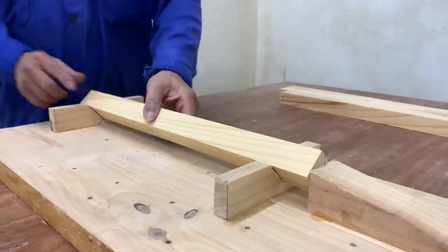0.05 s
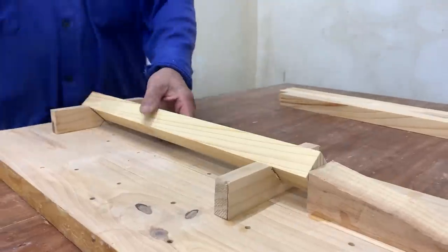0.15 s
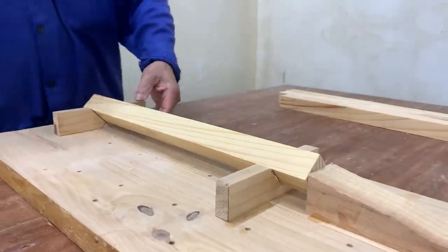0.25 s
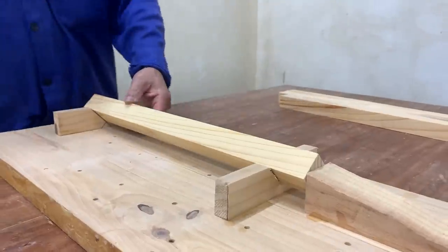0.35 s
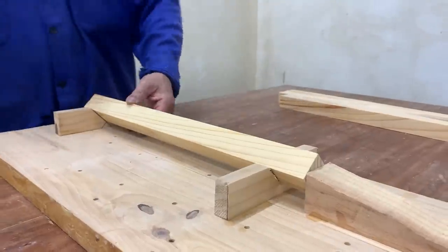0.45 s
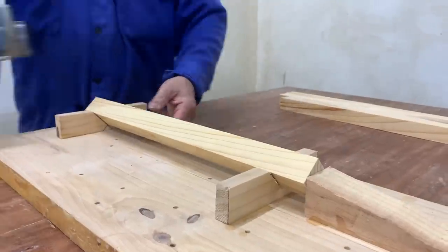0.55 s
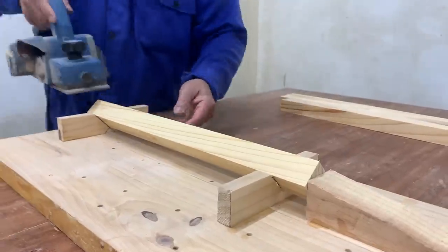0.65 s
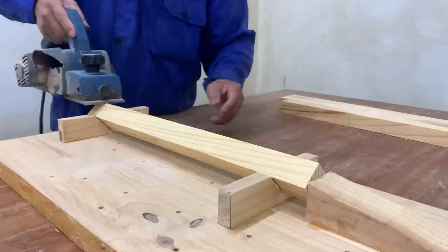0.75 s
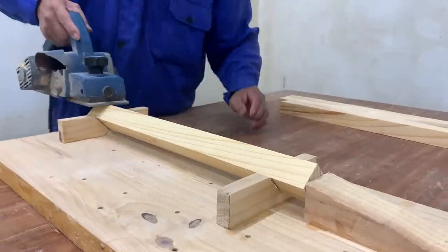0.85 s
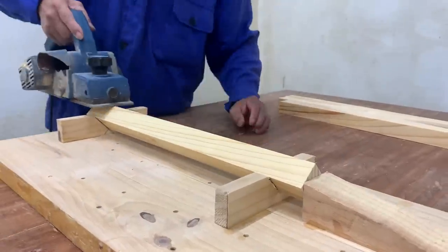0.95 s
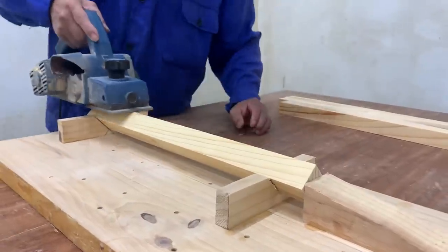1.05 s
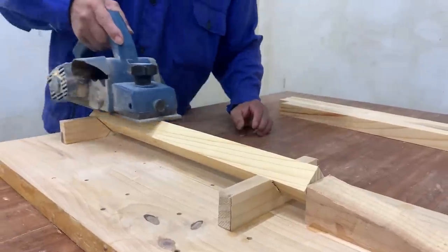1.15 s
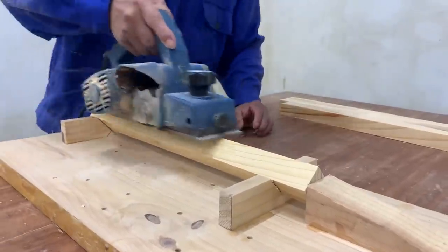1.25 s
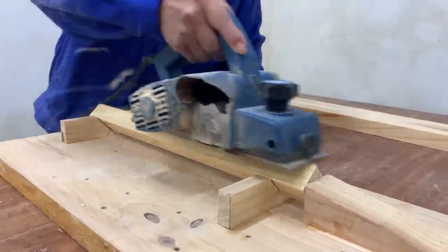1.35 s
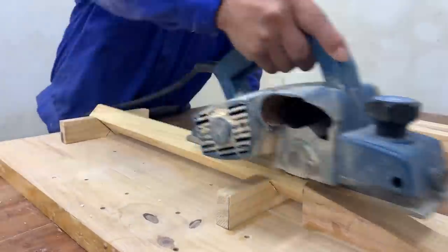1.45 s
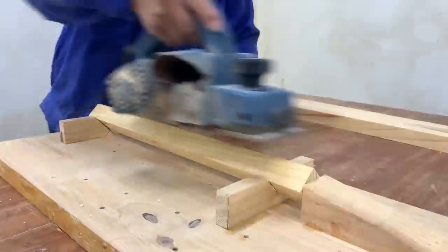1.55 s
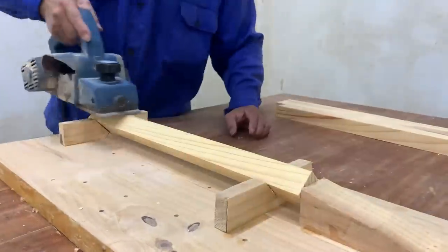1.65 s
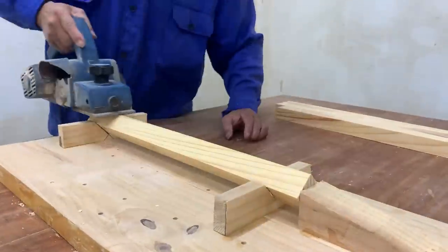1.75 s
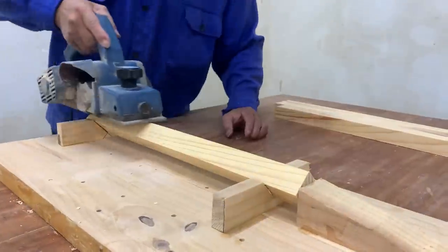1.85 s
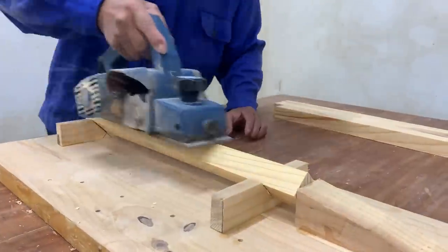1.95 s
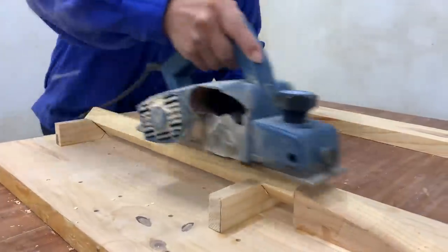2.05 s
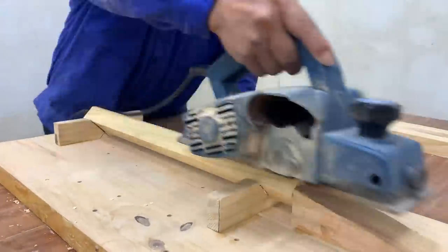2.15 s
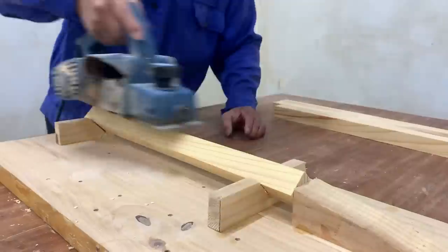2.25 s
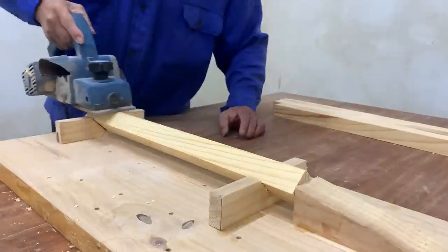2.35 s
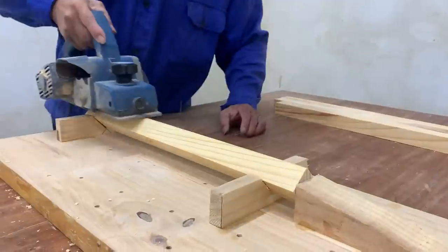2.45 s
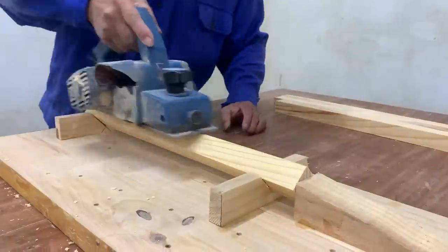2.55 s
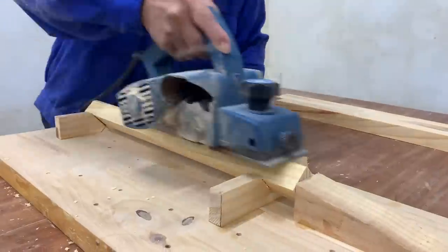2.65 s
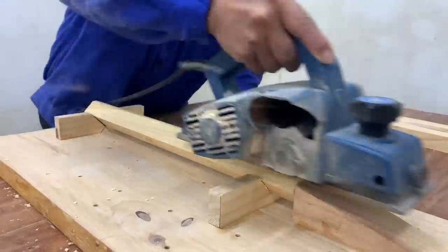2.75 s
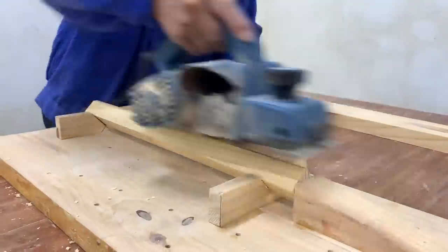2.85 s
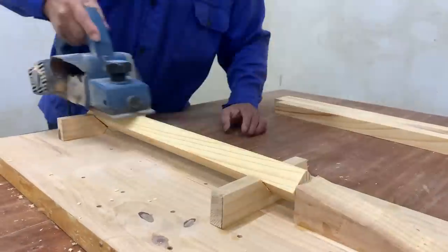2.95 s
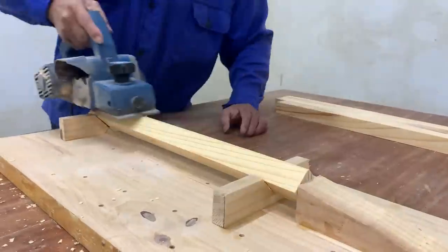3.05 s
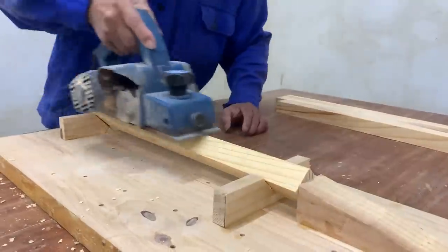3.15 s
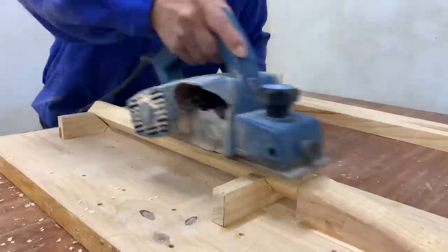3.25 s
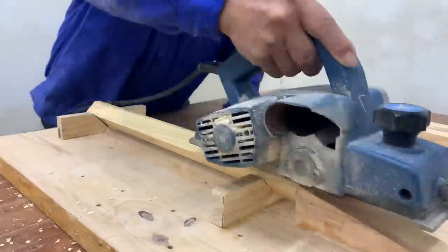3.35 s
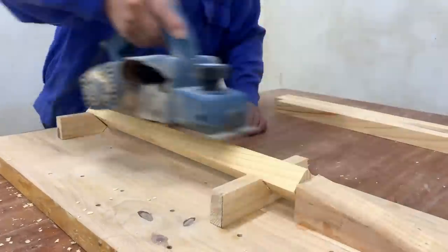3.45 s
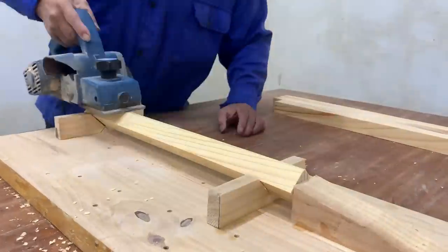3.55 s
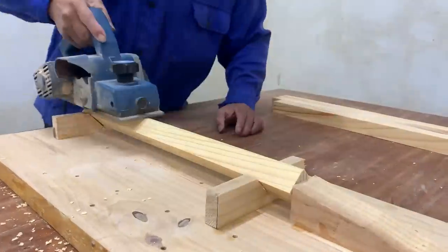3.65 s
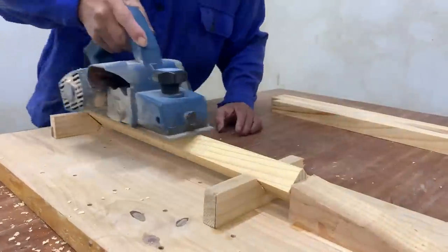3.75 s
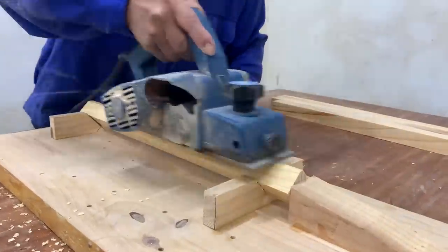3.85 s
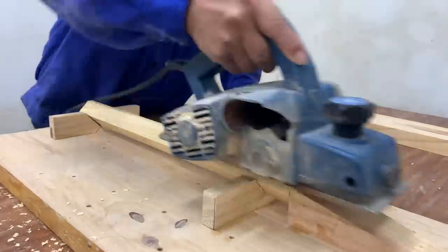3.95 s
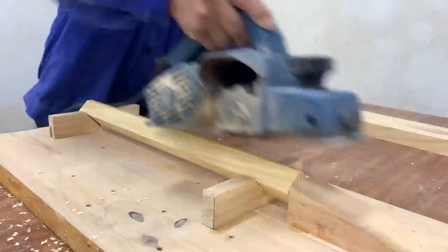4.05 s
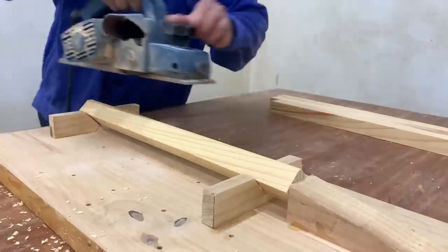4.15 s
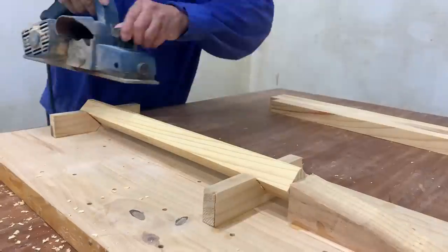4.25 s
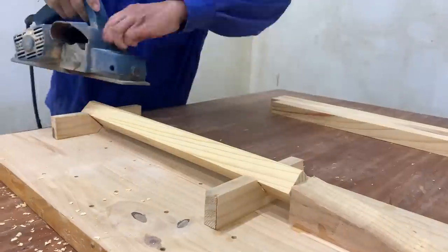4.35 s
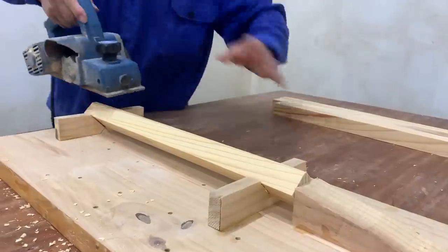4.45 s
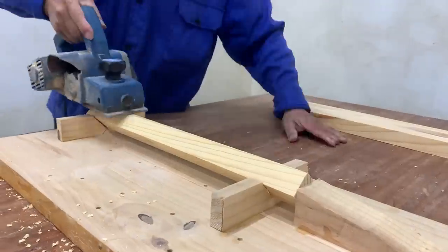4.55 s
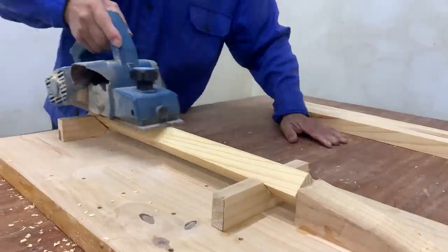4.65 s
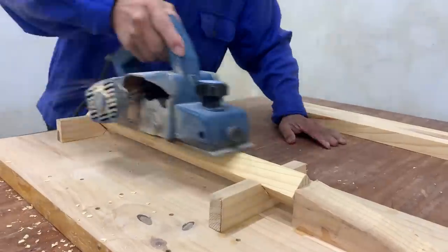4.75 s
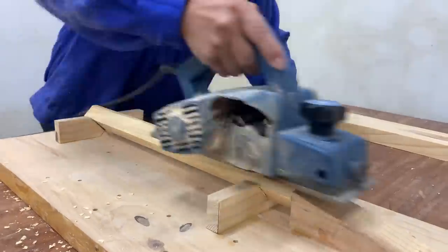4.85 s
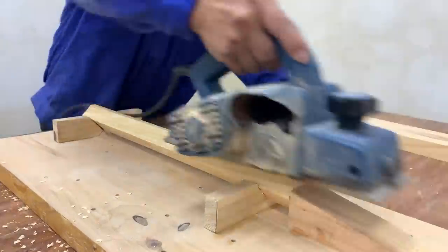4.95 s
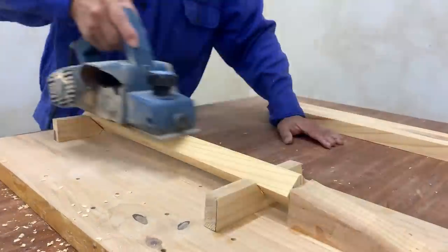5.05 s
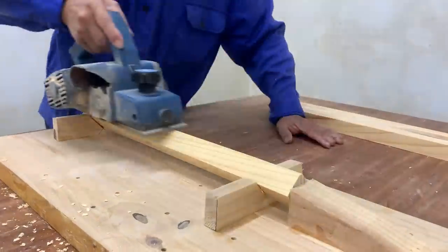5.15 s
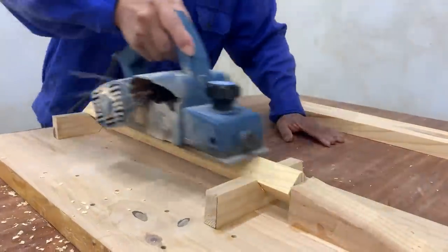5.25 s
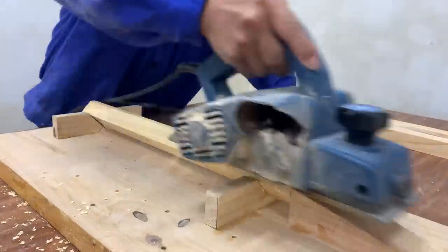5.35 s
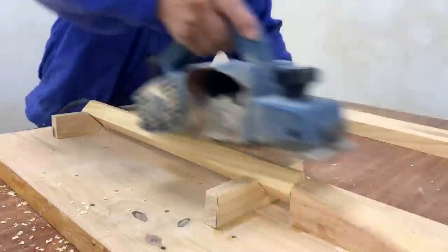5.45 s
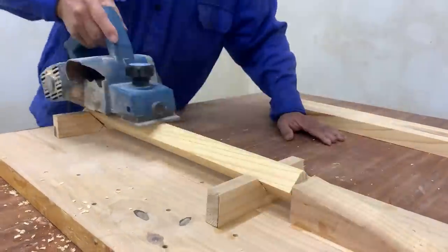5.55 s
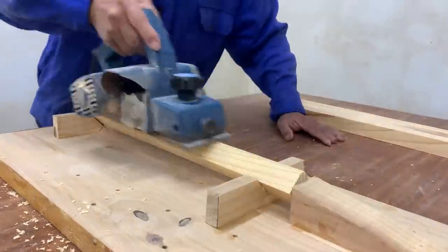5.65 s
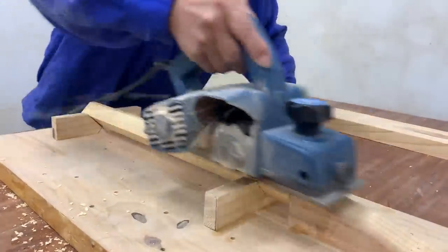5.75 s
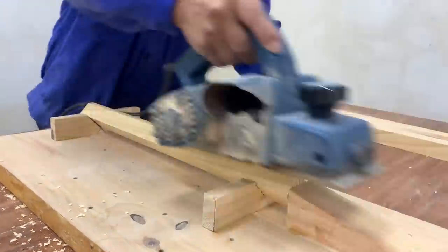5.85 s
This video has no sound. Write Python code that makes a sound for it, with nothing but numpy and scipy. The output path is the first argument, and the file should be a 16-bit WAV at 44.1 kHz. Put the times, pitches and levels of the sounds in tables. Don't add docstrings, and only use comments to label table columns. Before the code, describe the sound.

A dry, bare workshop is heard through close stereo microphones with little deep bass. From 0 to 0.4 s a wooden batten softly touches, chatters and cracks hard against its jig, the sharpest knock near 0.25 s; faint taps follow around 0.75-0.85 s. Beneath, a planer quietly coasts down with a thin high squeal. Near 0.97 s the motor kicks in with a short low buzz and slipping chirps, racing quickly up to a piercing, many-layered electric whine with rushing, hissy air. The tool swells closer and drops slightly in pitch on passes near 1.5, 2.3, 2.9, 3.4 and 4.1 s. Pitch and level sag briefly at 1.6-1.77 s, then more deeply during a long coast from 4.13 to 4.57 s. The whine climbs again, with further passes near 5.0, 5.5 and 5.9 s. Faint low bumps mark the sole meeting wood; it ends still running.

```python
import sys
import numpy as np
from scipy import signal
from scipy.io import wavfile
from scipy.ndimage import uniform_filter1d, minimum_filter1d

SR = 44100
rng = np.random.default_rng(int(sys.argv[2]) if len(sys.argv) > 2 else 0)


def persist_wave(psi):
    counts = np.round(np.clip(psi, -1, 1) * 32767).astype(np.int16)
    wavfile.write(sys.argv[1], SR, np.atleast_2d(counts).T)


def boost(x):
    u = np.asarray(x, float) / 20
    return 10 ** u


N = 259749

START_S = 0.972
TOP_HZ, PULL_HZ_PER_S, PULL_LAW, DRAG_HZ_PER_S, GRIP_S = 1773, 5300.0, 1.36, 1312.0, 0.03
COAST_HZ, COAST_PER_S, COAST_DB_PER_S = 780.0, 0.47, -17.5
SAG_HZ = 31.19
SURGE_S, LULL_S, LULL_DB = 0.18, 0.081, -4.5
# off t/s, on again t/s
RELEASES = [
    (1.595, 1.767),
    (4.134, 4.569),
]
# nearest t/s, reach/1, approach/s, retreat/s
STROKES = [
    (1.518, 1.27, 0.28, 0.14),
    (2.263, 1.006, 0.19, 0.083),
    (2.88, 0.9, 0.22, 0.093),
    (3.44, 0.92, 0.17, 0.097),
    (4.131, 0.81, 0.212, 0.19),
    (5.028, 0.999, 0.144, 0.11),
    (5.501, 1.02, 0.1, 0.084),
    (5.931, 0.96, 0.11, 0.095),
]

ORDERS = (12, 24, 36, 60, 6, 11, 22, 28.4)
# far level/dB, rise/dB per reach, rise/dB per octave of speed, surge/dB, coasting level/dB
VOICES = [
    (-31.5, 5, 27, -6, -42.5),
    (-28.5, 5.3, 25.5, 26.5, -42),
    (-36.5, 10.5, 25.5, 28.5, -45.5),
    (-47.5, 8, 21.6, 16, -66),
    (-46.5, 6, 18, 38, -39.5),
    (-37.5, 6, 30, 16, -58),
    (-35, 5.5, 11, 11, -57),
    (-41, 11.5, 9, 1, -48),
]
# shaft order/1, level/dB over the top air
SLOT_ORDERS = [(18, -11), (30, -2), (42, -5), (48, -1.5), (54, -7.5), (66, -7.5), (72, -4.5), (78, -16.5),
               (84, -9.5), (90, -24), (96, -5), (108, -9)]
# shaft order/1, level/dB over blades x2
FAN_ORDERS = [(33, -10), (44, -37), (55, -17.5), (67, -26.5), (99, -25)]
# shaft order/1, level/dB over the teeth
BELT_ORDERS = [(34.4, -16.5), (39.4, -11), (45.4, -30), (50.4, -17), (56.8, -17), (61.4, -12.5),
               (67.8, -40.5)]
UPPER_SURGE_DB, UPPER_LULL_DB = -4.5, -0.5
HOUSING_HZ, HOUSING_WIDTH, HOUSING_DB = 3320, 0.074, 4.5
# t/s, shaft order/1, level/dB, half width/s
GLINTS = [(1.29, 12.0, 12, 0.18), (1.3, 24.0, -17, 0.015), (1.45, 24.0, -9.5, 0.04),
          (1.46, 28.4, -13.5, 0.048), (1.61, 36.0, 4, 0.025), (1.69, 12.0, 8, 0.052),
          (1.712, 28.4, 10.4, 0.025), (1.941, 24.0, 5.5, 0.031), (2.13, 24.0, -17, 0.023),
          (2.49, 28.4, -5, 0.23), (2.578, 60.0, 16.5, 0.035), (3.11, 28.4, -17, 0.035),
          (3.19, 60.0, 16, 0.029), (3.27, 24.0, -12.3, 0.03), (3.31, 22.0, -10, 0.09),
          (3.38, 12.0, -3.5, 0.044), (3.83, 24.0, -18, 0.033), (4.03, 28.4, 6.5, 0.16),
          (4.11, 24.0, 2, 0.16), (4.24, 12.0, 6.5, 0.058), (4.39, 28.4, 6.5, 0.035), (5.43, 28.4, 7, 0.25),
          (5.47, 24.0, 2.5, 0.11), (5.69, 24.0, -14, 0.018),
          (1.1, 36.0, 6.5, 0.083), (1.35, 36.0, -6, 0.08), (1.38, 28.4, 6.5, 0.095), (1.9, 6.0, 8, 0.069),
         (1.95, 12.0, 4.5, 0.11), (2.37, 11.0, 12, 0.022), (2.46, 36.0, -16, 0.026), (2.52, 22.0, 4, 0.082),
         (2.59, 24.0, 5.5, 0.023), (2.72, 24.0, -10.0, 0.032), (3.22, 36.0, -7, 0.063),
         (3.56, 36.0, -2, 0.024), (4.0, 36.0, -11, 0.029), (4.008, 60.0, 11.5, 0.014),
         (4.569, 36.0, 14, 0.068), (5.34, 11.0, 7.5, 0.13), (5.69, 22.0, -3, 0.13), (5.82, 36.0, -3, 0.021),
         (5.83, 60.0, 12, 0.019), (5.88, 24.0, 1.5, 0.051)]
# t/s, shaft order/1, level/dB, half width/s
SWEEPS = [
    (1.035, 36, 4, 0.023),
    (1.067, 24, 8, 0.02),
    (1.03, 28.4, 6, 0.016),
    (0.97, 6, -4, .04),
    (4.44, 6, -8, 0.091),
    (4.17, 24, -4.5, 0.058),
    (4.37, 28.4, 2.5, 0.028),
    (4.55, 24, 6, 0.055),
    (4.66, 28.4, 9, 0.028),
    (4.3, 12, 2, 0.1),
]

# far level/dB, rise/dB per reach, rise/dB per octave, surge/dB
RUSH = (-38, 4, 7, 25)
LOW = (-14, 0.4, 3, -1)
TOP = (-7, 5, -2.5, 0.5)
LOW_LULL_DB, TOP_LULL_DB = -2, 0.5
SHOP_DB, SHOP_DB_PER_S, SHOP_TOP_DB, ECHO_DB, ECHO_DB_PER_S = -37, -12, -15, -13.5, -130
# f/Hz, level/dB per Hz
AIR_COLOUR = [(180, -37.5), (300, -22), (800, -20.5), (1290, -14.5), (1760, -9), (2330, -12), (3240, -10),
              (5700, -15), (8000, -16), (10400, -23), (12000, -18.5), (13600, -16.5), (14800, -14.5),
              (15600, -27)]
# f/Hz, level/dB per Hz
SHOP_COLOUR = [(40, -60), (110, -15), (240, -18), (330, -9), (500, -12), (850, -3), (1250, -8),
               (1650, -16.5), (2900, -9), (5000, -14.5), (6500, -21.5), (10000, -28), (15500, -35.5)]
# t/s, level/dB, dying/dB per s
BUMPS = [(.85, -51, -150), (.97, -48, -150), (1.17, -50.5, -140), (1.28, -56, -300), (1.758, -51.5, -300),
         (1.91, -58, -180), (2.18, -54, -280), (2.39, -54, -125), (2.78, -54.5, -400), (2.91, -58, -300),
         (3., -57, -300), (3.07, -49.5, -370), (3.34, -59, -370), (3.6, -53.5, -310), (3.71, -51, -135),
         (4.67, -57, -200), (4.74, -54, -85), (5.16, -49, -340), (5.26, -52, -150), (5.56, -53, -260),
         (5.66, -48, -170)]
BUMP_RISE_DB_PER_S = 308

# f/Hz, correlation/1
SAME = [(60, 0.17), (180, 0.72), (550, 0.6), (1650, 1), (4970, -0.51), (15000, -1.7)]
# f/Hz, left minus right level/dB
LEAN = [(60, -5), (180, -1), (550, -0.5), (1650, -4.5), (4970, 0.5), (15000, -2)]
# f/Hz, left lead/rad
LEAD = [(0, -0.5), (2930, 0.5), (7410, 2), (8010, -1.5), (9820, -1.4), (14300, -2), (16600, -2.5)]

# t/s, length/s, from f/Hz, to f/Hz, level/dB
SQUEAKS = [
    (.0, .55, 12620, 12560, -58),
    (.48, .04, 12550, 12550, -59),
    (.978, .028, 11650, 11700, -38),
    (1.025, .045, 10700, 11900, -32),
    (.982, .016, 2300, 2350, -30),
]
# t/s, level/dB, rattle length/s, first crack over the rattle/dB, swell/dB per s
KNOCKS = [
    (0.072, -28, 0.033, -5, -100.0),
    (0.141, -22, 0.033, 9, 120.0),
    (0.239, -19, 0.043, 23, -22),
    (.293, -33.5, 0.048, 8, -30.0),
    (0.746, -43, 0.018, -1, -54),
    (0.821, -54, 0.059, 6, -50.0),
    (0.85, -46, 0.022, -8, -46),
]
# f/Hz, width/Hz, level/dB
BATTEN = [(300, 26, -14.5), (463, 40, -2), (590, 44, -9), (716, 28, -7.5), (842, 19, -2.5), (901, 22, 0),
          (1190, 78, -4.5), (1380, 100, -5.5), (1830, 200, -5), (2210, 140, -4), (2790, 160, -6.5),
          (3460, 320, -7.5)]

HUM_START_DB, HUM_HOLD_S, HUM_DB_PER_S = -29, 0.048, -190
HUM_DB, HUM_NEAR_DB, HUM_OFF_DB = -56, -9.5, -16


def evened(x):
    return x / np.sqrt(np.mean(x ** 2) + 1e-20)


def read(points, hz):
    f, value = np.transpose(points)
    return np.interp(np.log(hz + 1), np.log(f + 1), value)


def wander(per_s, count, t):
    knots = evened(uniform_filter1d(rng.standard_normal((count, 2400)), 4, axis=1))
    return np.array([np.interp(t * per_s * 4, np.arange(2400), k) for k in knots])


def bell(x):
    return np.exp(-0.5 * x ** 2)


def resonate(x, hz, width_hz):
    turn = np.exp(2j * np.pi * np.cumsum(hz * np.ones(len(x))) / SR)
    r = np.exp(-np.pi * width_hz / SR)
    return 2 * (turn * signal.lfilter([1 - r], [1, -r], x / turn)).real


def add(mix, s, sound):
    part = mix[round(s * SR):][:len(sound)]
    part += sound[:len(part)]


def controls(t):
    step = 64 / SR
    s = np.arange(START_S, N / SR + 0.1, step)
    off = sum(np.clip((s - a) / step, 0, 1) - np.clip((s - b) / step, 0, 1) for a, b in RELEASES)
    current = (1 - off) * np.minimum((s - START_S) / GRIP_S, 1)
    hz = [COAST_HZ * np.exp(-COAST_PER_S * START_S)]
    for on in current[1:]:
        pull = PULL_HZ_PER_S * ((hz[-1] / TOP_HZ) ** -PULL_LAW - 1) + DRAG_HZ_PER_S
        hz.append(hz[-1] + step * (on * pull - DRAG_HZ_PER_S))
    free = np.interp(t, s, hz)
    lull = np.interp(t, s, signal.lfilter([step / LULL_S], [1, step / LULL_S - 1], off))
    reach = sum(far * bell((t - s0) / np.where(t < s0, come, go)) for s0, far, come, go in STROKES)
    since = np.maximum(t - START_S, 0)
    loaded = free - SAG_HZ * reach * np.minimum(since / GRIP_S, 1)
    slot_hz = np.where(t < START_S, COAST_HZ * np.exp(-COAST_PER_S * t), loaded)
    return slot_hz, reach, np.log2(free / TOP_HZ), np.exp(-since / SURGE_S), lull


def line_levels(t):
    slot_hz, *drive, lull = controls(t)
    rows = np.array(VOICES)
    db = rows[:, :1] + rows[:, 1:4] @ drive + LULL_DB * lull

    def shell(slot):
        line_hz = np.outer(ORDERS, slot) / 12
        return HOUSING_DB * bell(np.log(line_hz / HOUSING_HZ) / HOUSING_WIDTH)

    db += shell(slot_hz) - shell(TOP_HZ)
    for s, order, glint_db, width in GLINTS + SWEEPS:
        db[np.argmin(abs(np.array(ORDERS) - order))] += glint_db * bell((t - s) / width)
    return slot_hz, np.where(t < START_S, rows[:, 4:] + COAST_DB_PER_S * t, db)


def air_levels(t, catch_db=-15.5, catch_s=0.06):
    _, *drive, lull = controls(t)
    rush, low, top = (row[0] + np.array(row[1:]) @ drive for row in (RUSH, LOW, TOP))
    rush = rush + LULL_DB * lull + catch_db * np.exp(-abs(t - START_S) / catch_s)
    running = [rush, low + LOW_LULL_DB * lull, top + TOP_LULL_DB * lull]
    echo = sum(boost(db + ECHO_DB + ECHO_DB_PER_S * (t - s)) * (t > s) for s, db, *_ in KNOCKS)
    fan_db = SHOP_DB + SHOP_DB_PER_S * t
    shop = 20 * np.log10(np.hypot(boost(fan_db), echo))
    return np.where(t > START_S, running, [shop, 0 * t, SHOP_TOP_DB + fan_db - shop])


def whine(flutter_db=1.5, spread=0.72, wobble=0.001):
    t, at = np.arange(0, N + 64, 64) / SR, np.arange(N) / SR
    slot_hz, levels = line_levels(t)
    wobbly_hz = slot_hz * (1 + wobble * wander(30, 1, t)[0])
    shaft = 2 * np.pi * np.cumsum(np.interp(at, t, wobbly_hz)) / SR / 12
    rush, _, top = air_levels(t)
    top = top + (t > START_S) * ([UPPER_SURGE_DB, UPPER_LULL_DB] @ np.array(controls(t)[3:]))
    lines = list(zip(ORDERS, levels))
    lines += [(k, rush + top + db - 10.0 * (t < START_S)) for k, db in SLOT_ORDERS]
    lines += [(k, levels[-2] + db) for k, db in FAN_ORDERS]
    lines += [(k, levels[-1] + db) for k, db in BELT_ORDERS]
    fade_db = [1.0, 3.0, 3.5, 4.0, 2.5, 1.5, 2.5, 3.0] + [5.5] * 30
    fades, flutters, leans = (wander(per_s, len(lines), t) for per_s in (24, 60, 5))
    out = np.zeros((2, N))
    for i, (order, db) in enumerate(lines):
        flutter = flutter_db * (order / 24) ** 0.72 * flutters[i]
        fade = fade_db[i] * np.minimum(fades[i], 0.5)
        level = np.sqrt(2) * boost(db + flutter + fade)
        lean = np.interp(at, t, spread * (order / 24) ** 0.7 * leans[i] / 2)
        tilt = boost(read(LEAN, order * 130.0) / 2)
        tone = np.cos(order * shaft + i + np.array([lean, -lean]))
        out += np.interp(at, t, level) * tone * [[tilt], [1 / tilt]]
    return out


def air(patchy_db=2.5, flicker_db=2.0, blade_db=3.0, blade_width=0.13):
    frames, hz = N // 128 + 5, np.fft.rfftfreq(512, 1 / SR)[:, None]
    t = np.arange(frames) * 128 / SR
    rush, low, top = air_levels(t)
    running = t > START_S
    a, b, c, d, patches = rng.standard_normal((frames, 257, 5)).T
    patches = evened(uniform_filter1d(uniform_filter1d(patches, 6, 0), 16, 1))
    flicker = evened(uniform_filter1d(rng.standard_normal(frames), 4))

    air_colour = read(AIR_COLOUR, np.minimum(hz, 15500)) - read(AIR_COLOUR, 2400)
    shop_colour = read(SHOP_COLOUR, hz) - read(SHOP_COLOUR, 2400)
    colour = np.where(running, air_colour, shop_colour)
    lowness = np.clip(np.log2(1700 / (hz + 1)), 0, 1)
    topness = np.clip(np.log2((hz + 1) / 3500) / 0.53, 0, 1)
    low, top = (v - np.where(running, v[running].mean(), v[~running].mean()) for v in (low, top))
    slot_hz = controls(t)[0]
    humps = sum(bell(np.log((hz + 1) / (k * slot_hz)) / blade_width) for k in (0.95, 1.92))
    db = rush + colour + lowness * low + topness * top + running * blade_db * humps
    db = db + patchy_db * patches + flicker_db * topness * flicker

    bumps = [bump_db + np.where(t < s, BUMP_RISE_DB_PER_S, fall) * (t - s) for s, bump_db, fall in BUMPS]
    floor_db = np.where(running, -72.0, -90.0)
    rumble = boost(np.maximum(np.max(bumps, axis=0), floor_db) + 2.5)
    rumble = rumble * np.exp(-((hz - 190.0) / 70.0) ** 2)

    same = np.clip(read(SAME, hz), -1, 1) * (running | (hz < 7000))
    left = a + 1j * b
    right = abs(same) * left + np.sqrt(1 - same ** 2) * (c + 1j * d)
    ports = boost(read(LEAN, hz) / 2) * np.exp(0.5j * read(LEAD, hz))
    z = np.array([left * ports, right / ports])
    return signal.istft(z * (boost(db - 11.5) + rumble), nperseg=512, noverlap=384)[1][:, :N]


def squeaks(width_hz=57.0):
    out = np.zeros(N)
    for s, length, from_hz, to_hz, db in SQUEAKS:
        hz = np.linspace(from_hz, to_hz, round(length * SR))
        slip = rng.standard_normal(SR)[:len(hz)]
        ring = resonate(resonate(slip, hz, width_hz), hz, width_hz)
        add(out, s, boost(db) * evened(ring) * np.hanning(len(hz)))
    return out


def knocks():
    out, t = np.zeros(N), np.arange(5000) / SR
    for s, db, length, crack_db, swell_db in KNOCKS:
        chatter = rng.standard_normal(5000) * np.clip(t / 0.0013, 0, 1) * boost(swell_db * t)
        chatter[150] += boost(crack_db)
        wood = np.zeros(5000)
        for k, (hz, width_hz, mode_db) in enumerate(BATTEN):
            fade = boost(-0.2 * np.maximum(hz - 1000, 0) * t)
            mode = resonate(chatter * fade, hz, width_hz) / np.sqrt(width_hz)
            wood += (-1) ** k * boost(mode_db) * mode
        wood *= boost(-2500.0 * np.maximum(t - length, 0))
        add(out, s, boost(db) * wood / np.std(wood[:round(length * SR)]))
    return out


def workshop(x, t60=0.15):
    taps = np.zeros((2, 24000))
    at = np.arange(300, 23900, 20) + rng.integers(0, 20, (2, 1180))
    np.put_along_axis(taps, at, rng.choice([-1.0, 1.0], at.shape), 1)
    taps *= boost(-60 * np.arange(24000) / SR / t60)
    return signal.fftconvolve(x[None], taps / np.linalg.norm(taps[0]), axes=1)[:, :N]


def hum(hz=306.0, fuzz=0.53):
    t = np.arange(N) / SR
    tone = np.sqrt(2) * np.cos(2 * np.pi * hz * t + fuzz * wander(20, 1, t)[0])
    _, reach, _, _, lull = controls(t)
    starting = boost(HUM_START_DB + HUM_DB_PER_S * np.maximum(t - START_S - HUM_HOLD_S, 0))
    steady = boost(HUM_DB + HUM_NEAR_DB * reach + HUM_OFF_DB * lull)
    return (starting + steady) * tone * np.clip((t - START_S) / 0.002, 0, 1)


def scene():
    tool, wood = whine(), knocks()
    near = tool + air() + hum() + (wood + squeaks()) * boost([[-1.2], [1.2]])
    return near + boost(-3.0) * workshop(wood) + boost(-7.0) * workshop(tool.mean(0))


def top_cut(x):
    return signal.sosfilt(signal.butter(12, 17040, fs=SR, output="sos"), x)


def record(dry):
    cut = signal.sosfilt(signal.butter(2, 110.0, "highpass", fs=SR, output="sos"), dry)
    hz, _, z = signal.stft(cut, SR, nperseg=2048, noverlap=1024)
    power = (abs(z) ** 2).mean(0)
    bands = power[:20].reshape(5, 4, -1).sum(1).repeat(4, 0)
    loudness = minimum_filter1d(power.sum(0), size=3)
    margin_db = 10 * np.log10(bands / loudness + 1e-12) + 37.6
    z[:, :20] *= boost(-29.0) + 1 / (1 + boost(-6.0 * margin_db))
    z[:, hz > 15790] = 0
    mix = signal.istft(z, SR, nperseg=2048, noverlap=1024)[1][:, :N]
    return top_cut(mix)


dry = scene()
out = record(dry)
persist_wave(out)
```